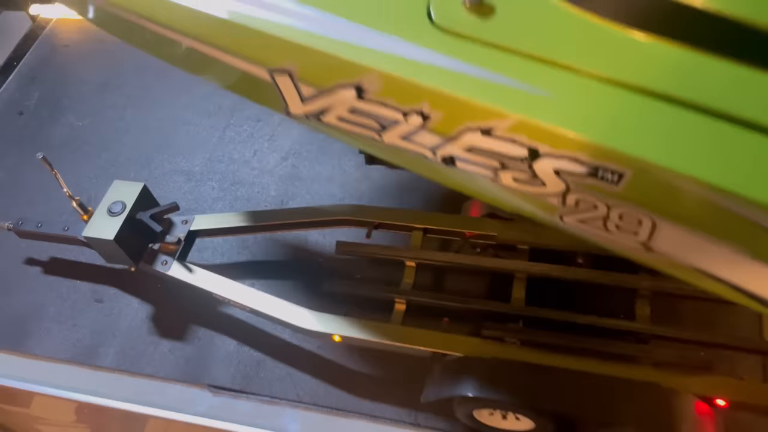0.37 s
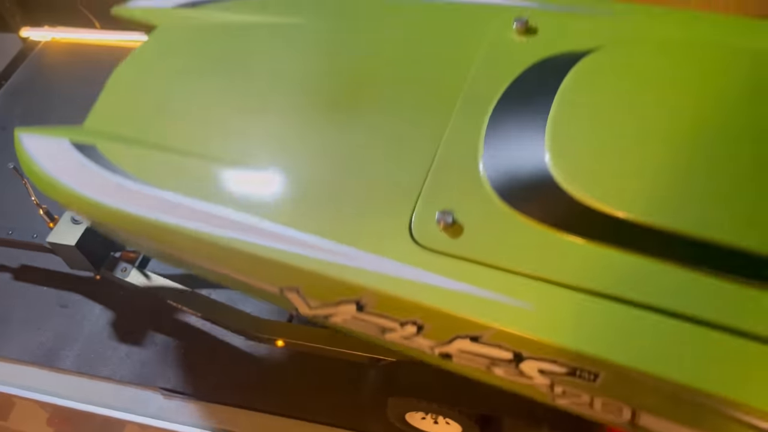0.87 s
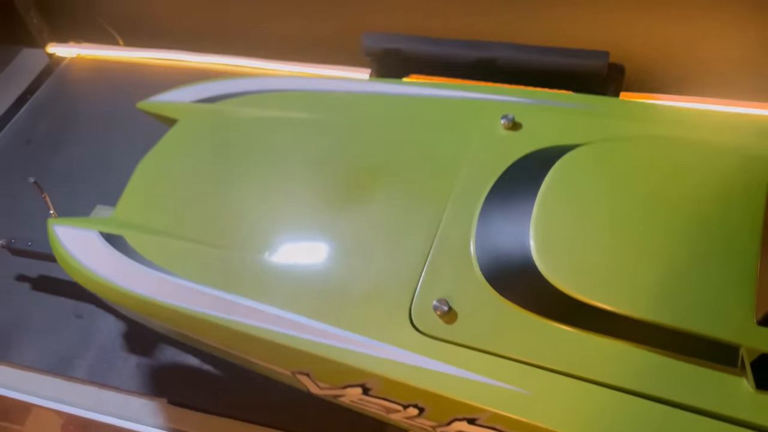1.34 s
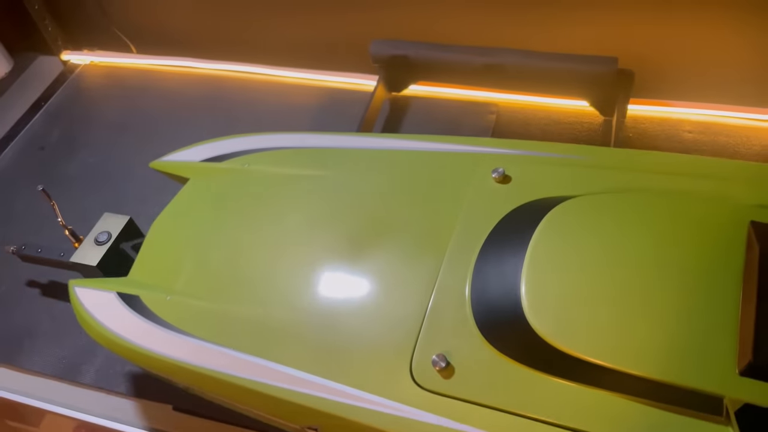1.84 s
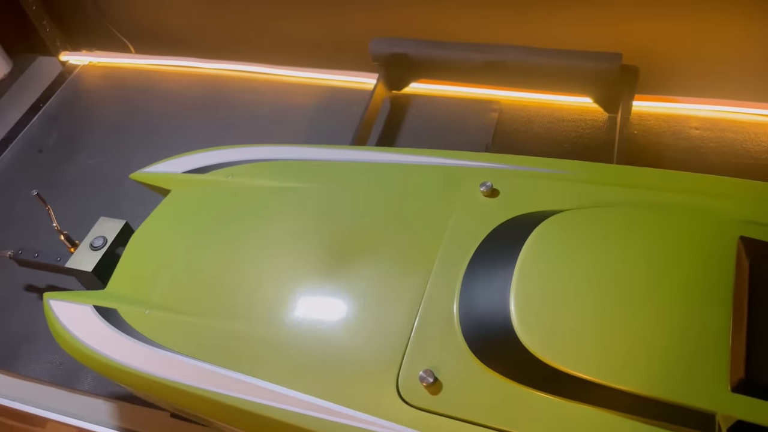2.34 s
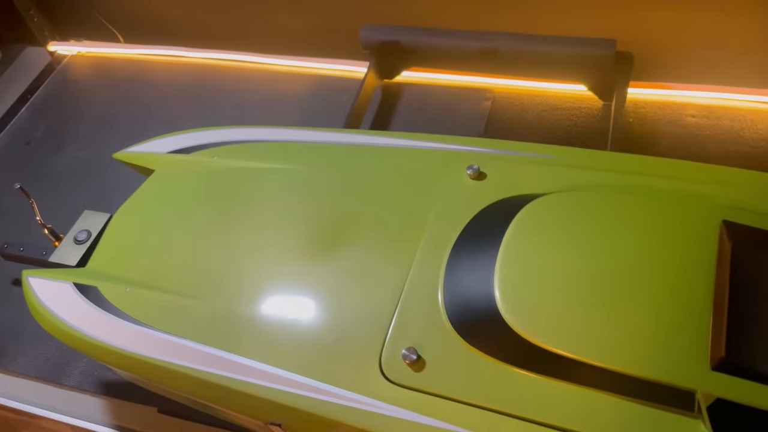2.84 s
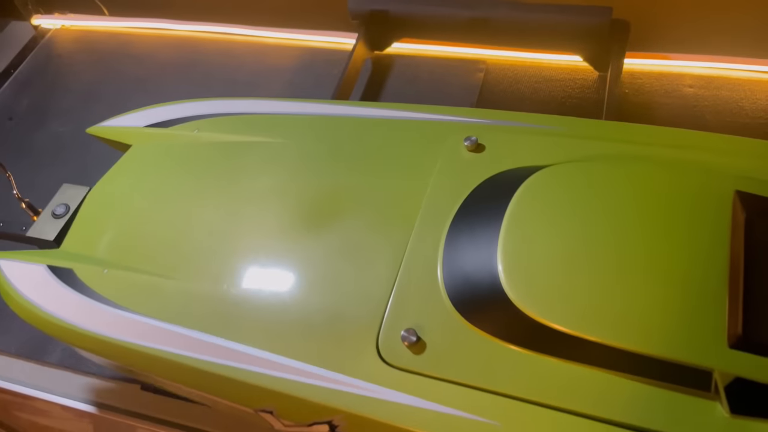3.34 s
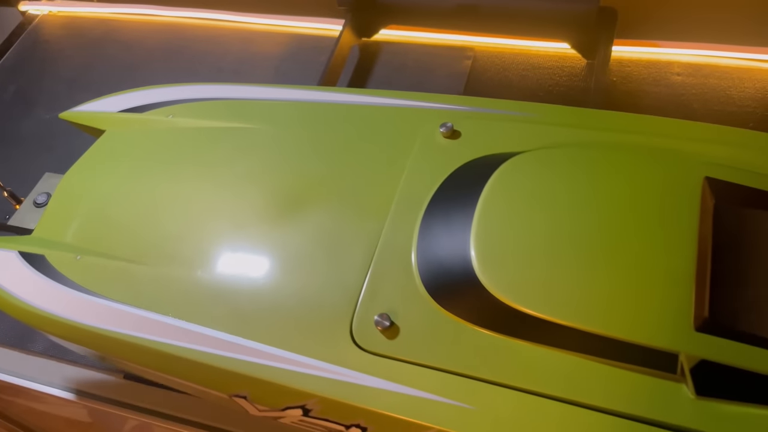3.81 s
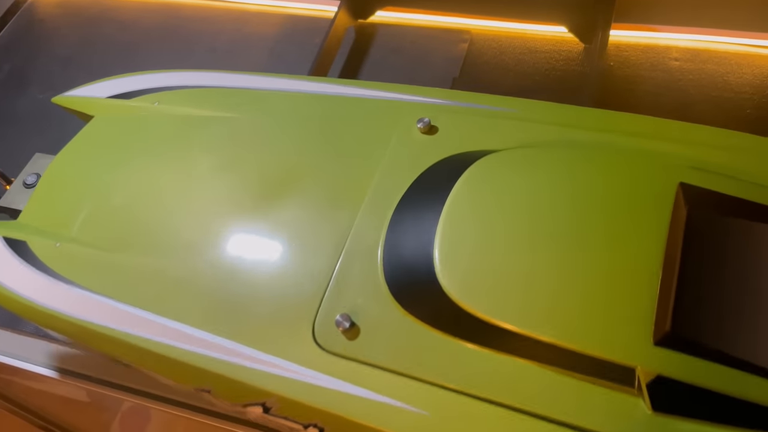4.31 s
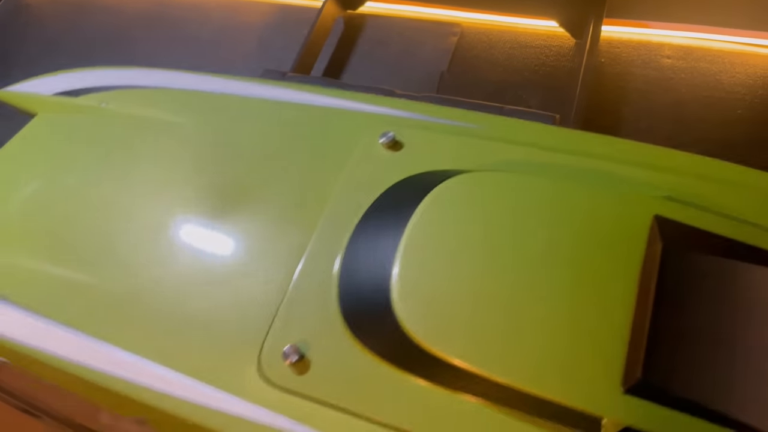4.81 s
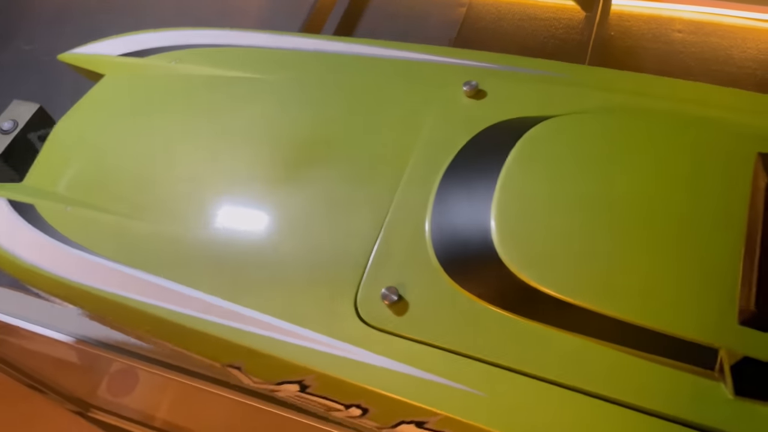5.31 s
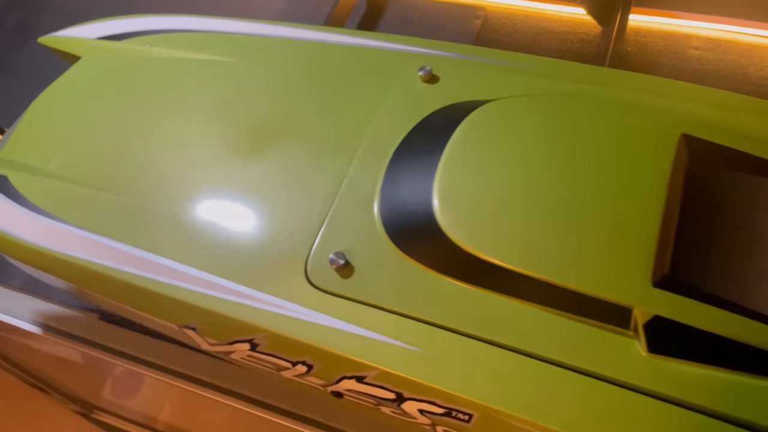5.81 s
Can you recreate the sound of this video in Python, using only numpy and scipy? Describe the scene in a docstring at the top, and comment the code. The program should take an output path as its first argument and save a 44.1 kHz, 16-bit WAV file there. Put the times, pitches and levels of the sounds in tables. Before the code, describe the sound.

In a quiet room with low rumble, faint rubs and ticks precede a loud hollow plastic clunk on a metal trailer near two seconds, followed by quick fading taps. Short shoves then drag the hull along the rails with knocks, brief squeaks and gritty rasp. Two heavy knocks follow after five seconds, then a last rub. Close stereo microphone.

```python
"""A quiet room, low rumble and still air, heard from close by with a two-port microphone.
Faint rubs and ticks come first, then a hollow plastic hull lands on a small metal trailer with a clunk.
Short shoves drag it along the rails with knocks, squeaks and some rasp; two more heavy knocks and a last rub follow.
Damped modes make the shell and rails ring, damped sines make the loaded frame bob on its tyres,
shaped noise makes the rubbing, and decaying noise makes the walls answer."""
import sys
import numpy as np
from scipy import signal
from scipy.fft import rfft, irfft, next_fast_len
from scipy.io import wavfile
from scipy.ndimage import uniform_filter1d, map_coordinates

SR = 44100
rng = np.random.default_rng(int(sys.argv[2]) if len(sys.argv) > 2 else 0)


def digitize_waveform(pressure):
    """Quantize a signal to 16-bit integers and store it at the path in sys.argv[1].

    Rows of a 2-D input are taken as channels; values are limited to [-1, 1].
    """
    field = np.atleast_2d(pressure).T
    bounded = np.clip(field, -1, 1)
    quanta = np.round(bounded * 32767).astype(np.int16)
    wavfile.write(sys.argv[1], SR, quanta)


def level_to_linear(level):
    """Convert decibel levels to linear amplitude factors, elementwise."""
    exponent = np.asarray(level, float) / 20
    return 10 ** exponent


N = 260714  # length in samples

# modes of the plastic shell, for blows and rubbing alike: mode_hz [Hz], level_db [dB], t60_s [s]
SHELL_MODES = [(236, -6, 0.13), (262, -13, 0.1), (311, -6, 0.16), (360, -8, 0.15), (411, -2, 0.09),
               (454, 0, 0.14), (498, -9, .1), (540, -5, 0.12), (588, -9, 0.08), (682, -9, 0.12),
               (848, -13, 0.035)]
# modes of the metal rails, for hard edges and rubbing: mode_hz [Hz], level_db [dB], t60_s [s]
RAIL_MODES = [(1013, -4, 0.07), (1215, -2, 0.05), (1340, -1, 0.06), (1454, -4, 0.05), (1600, -3, 0.045),
              (1716, -3, .05), (1830, -2, 0.04), (1959, 2, 0.08), (2100, -3, 0.05), (2275, 0, .06),
              (2430, -5, 0.05), (2640, -8, .04), (2870, -12, 0.04), (3120, -15, 0.04)]
# after a heavy landing the hull rocks to rest in ever slower, weaker taps:
# start_s [s], first_gap_s [s], first_level_db [dB], edge_hz [Hz], crack_db [dB re tap], taps [count]
ROCKING_TAPS = [(1.937, .0195, -19, 1900, -16, 6), (5.192, .036, -29, 1500, -32, 2)]


def unit(x):
    """Scaled to rms 1."""
    return x / np.sqrt(np.mean(x ** 2) + 1e-20)


def along(points, hz):
    """Reads (Hz, value) points on a log frequency axis."""
    f, v = np.transpose(points)
    return np.interp(np.log(hz + 1), np.log(f + 1), v)


def gains(rows):
    """One gain per sample for each dB column; all but silent outside the rows, with soft ends."""
    s, *columns = np.transpose(rows)
    t = np.arange(N) / SR
    level = np.array([level_to_linear(np.interp(t, s, column, -150, -150)) for column in columns])
    return np.abs(uniform_filter1d(level, size=400, axis=1))


def wobble(rate):
    """A smooth random curve, rate knots a second."""
    knots = rng.standard_normal(int(N * rate / SR) + 4)
    return map_coordinates(knots, [np.arange(N) * rate / SR])


def filtered(x, response):
    """x shaped by a response given as a function of frequency."""
    m = next_fast_len(N + SR // 2)
    return irfft(rfft(x, m) * response(np.fft.rfftfreq(m, 1 / SR)), m)[..., :N]


def spread(two, colour):
    """Mixes two unrelated signals to left and right: alike in the bass, mostly less so in the treble."""
    # likeness of the two ports, negative where they oppose: band_hz [Hz], likeness [-1 to 1]
    alike = [(100, .96), (300, .93), (520, .6), (900, .35), (2600, .2), (6000, .1), (8500, -.7),
             (10500, -.6), (13000, .6)]

    def turn(hz):
        return np.arccos(np.clip(along(alike, hz), -1, 1)) / 2

    mid, side = filtered(two, lambda hz: colour(hz) * [np.cos(turn(hz)), np.sin(turn(hz))])
    return np.array([mid + side, mid - side])


def pair(colour, grain=1):
    """Coloured stereo noise of rms 1; grain roughens the drive ahead of the colour."""
    return unit(spread(grain * rng.standard_normal((2, N)), colour))


def shoves():
    """Gains of shell, rails and grit: a brighter rub drives the rails more and the grit more still."""
    # one curve a shove: start_s [s], pressure_db [dB], brightness_db [dB, rails over shell]
    curves = [
        [(0.0, -76, -2.5), (0.058, -75, 1.5), (0.1, -81, -2), (0.2, -101, -9)],
        [(0.36, -86, -3), (0.418, -76, -1.5), (0.444, -69, 3.5), (0.532, -102.5, 1.5), (0.578, -99, -5.5),
         (0.612, -71, -2), (0.72, -105, -13)],
        [(2.38, -77, -19), (2.494, -59, -17), (2.544, -60.5, -17), (2.575, -69.5, -11), (2.64, -54, -19.5),
         (2.716, -57, -14), (2.828, -67, -19.5), (2.89, -83.5, -38)],
        [(3.045, -61, -14), (3.07, -54.5, -14), (3.15, -55, -14.5), (3.255, -52.5, -10), (3.295, -50.5, -22.5),
         (3.315, -46, -17.5), (3.4, -50.5, -8), (3.435, -53.5, -12), (3.49, -49.5, -5), (3.576, -72, -32),
         (3.63, -69.5, -17)],
        [(3.635, -70, -19), (3.674, -60, -16), (3.732, -64, -12.5), (3.792, -61.5, -10.5), (3.866, -59.5, -13),
         (3.918, -57.5, -5), (3.996, -58, -11), (4.06, -80, -24.5), (4.102, -101, -10)],
        [(4.15, -86, -16), (4.172, -62, -9.5), (4.242, -59, -14), (4.298, -52, -4.5), (4.385, -57.5, -6.5),
         (4.41, -58, -23), (4.43, -51.5, -3.5), (4.478, -53, -2), (4.495, -77, -20), (4.575, -87.5, -8)],
        [(4.596, -62, -11.5), (4.625, -69.5, -24.5), (4.65, -56.5, -24), (4.68, -52.5, -36), (4.711, -86, -12),
         (4.78, -82, -25)],
        [(5.165, -68, 4), (5.2, -62, 4), (5.235, -63, 4), (5.255, -88, 0)],
        [(5.5, -70, 4.5), (5.548, -62.5, -2.5), (5.726, -54, -5), (5.762, -56, -3.5), (5.818, -58, 2),
         (5.86, -62.5, 4.5), (5.91, -46, -6)],
    ]
    grit_db, grit_grows = -9.5, 2.13  # grit over shell at brightness 0; dB of grit per dB of brightness
    total = 0
    for rows in curves:
        total = total + gains([(s, db, db + bright_db, db + grit_db + grit_grows * bright_db)
                               for s, db, bright_db in rows])
    return total


def background():
    """A lumpy low rumble, stirred by jolts of the floor and by shoves, over the still air of the room."""
    # room rumble: start_s [s], level_db [dB]
    rumble_level = [(0.0, -59.5), (0.4, -64), (0.67, -64.5), (0.92, -62), (1.4, -66), (2.4, -61),
                    (4.0, -60.5), (5.0, -62.5), (5.91, -61)]
    # colour of the rumble: band_hz [Hz], density_db [dB per Hz]
    lows = [(13, -50), (22, -24), (49, -5.5), (91, -11), (104, -12.5), (124, -8), (140, -8), (168, -22.5),
            (250, -23.5), (320, -55), (550, -120)]
    # colour of the still air: band_hz [Hz], density_db [dB per Hz]
    air_colour = [(150, -25.5), (220, -8), (380, -6.5), (600, -18.5), (1000, -24), (2000, -28.5),
                  (4000, -34.5), (6500, -36), (8500, -30), (13000, -25)]
    # jolts that shake the floor: start_s [s], level_db [dB], t60_s [s]
    floor_jolts = [(1.961, -40, 1), (2.599, -45.5, 0.44), (3.3, -63.5, 0.74), (3.47, -44.5, 1),
                   (4.6, -38.5, 0.45), (5.123, -31, 0.35), (5.418, -45, 0.54)]
    rise_s, shove_shakes_db, air_db = 0.077, -12, -74.5
    t = np.arange(N) / SR
    level = gains(rumble_level) + level_to_linear(shove_shakes_db) * shoves()[0]
    for s, db, t60 in floor_jolts:
        since = np.clip(t - s, 0, None)
        level = level + level_to_linear(db - 60 * since / t60) * (1 - np.exp(-since / rise_s))
    lumps = level_to_linear(2.4 * wobble(9))
    rumble = level * unit(lumps * pair(lambda hz: level_to_linear(along(lows, hz))))
    return rumble + level_to_linear(air_db) * pair(lambda hz: level_to_linear(along(air_colour, hz)))


def resonances(modes, hz, widen):
    """Gain of the modes under steady drive; widen scales the width of each resonance."""
    power = sum(level_to_linear(2 * db) / (1 + ((hz - c) * t60 / widen) ** 2) for c, db, t60 in modes)
    return np.sqrt(power)


def dragging():
    """The hull judders along the rails: uneven slips drive shell and rails and shed grit."""
    # broad colour of rubbing: band_hz [Hz], density_db [dB per Hz]
    rub = [(120, -5.5), (200, -6.5), (300, -5.5), (420, 0.5), (600, -5.5), (800, -9.5), (1600, -9.5),
           (2400, -20), (3200, -25.5), (4500, -58.5)]
    # colour of the grit: band_hz [Hz], density_db [dB per Hz]
    grit_colour = [(2200, -20.5), (3000, -7.5), (3600, -7), (4400, -10.5), (5000, -11.5), (5600, -12.5),
                   (6500, -8.5), (8000, -11.5), (11000, -20.5), (15000, -19.5)]
    shell, rails, grit = shoves()
    judder = [unit(level_to_linear(1.7 * wobble(50))) for _ in range(3)]
    slips = level_to_linear(2.5 * wobble(400))

    def upper(hz):  # share of the rub that goes to the rails
        return 1 / (1 + (900 / (hz + 1)) ** 6)

    def shell_colour(hz):  # contact damps the shell and so widens its modes
        return level_to_linear(along(rub, hz)) * (1 - upper(hz)) * (8.9 + resonances(SHELL_MODES, hz, widen=1.7))

    def rail_colour(hz):
        return level_to_linear(along(rub, hz)) * upper(hz) * (10.0 + resonances(RAIL_MODES, hz, widen=0.59))

    low = pair(shell_colour, slips)
    mid = pair(rail_colour, slips)
    high = pair(lambda hz: level_to_linear(along(grit_colour, hz)), slips)
    return shell * low * judder[0] + rails * mid * judder[1] + grit * high * judder[2]


def walls(x):
    """Each frequency of the room's answer dies at its own speed; a new noise tail every quarter second."""
    # decay of the room: band_hz [Hz], t60_s [s]
    room_decay = [(100, 0.47), (400, 0.3), (2000, 0.38), (8000, 0.37)]
    out, step = np.zeros((2, N + 2 * SR)), SR // 4
    for start in range(0, N, step):
        hz, t, z = signal.stft(rng.standard_normal((2, SR * 3 // 5)), SR, nperseg=512)
        fade = level_to_linear(-60 * t / along(room_decay, hz)[:, None])
        tail = signal.istft(z * fade, SR, nperseg=512)[1]
        tail = tail / np.linalg.norm(tail[0])
        wet = signal.fftconvolve(x[:1, start:start + step], tail, axes=1)  # the left side feeds the room
        out[:, start + 200:][:, :wet.shape[1]] += wet  # 200 samples of delay
    return spread(out[:, :N], np.ones_like)


def ring(modes, t, scatter_db, skew, tilt_db):
    """Damped modes, stirred anew by each contact: skew radians out of step, tilt dB an octave."""
    hz, db, t60 = np.transpose(modes)[:, :, None]
    db = db + tilt_db * np.log2(hz) + scatter_db * rng.standard_normal(hz.shape)
    phase = skew * rng.standard_normal(hz.shape)
    wave = np.sum(level_to_linear(db - 60 * t / t60) * np.sin(2 * np.pi * hz * t + phase), 0)
    return wave / np.linalg.norm(level_to_linear(db))


def taps():
    """Rows like the blows for the hull rocking to rest."""
    gap_grows, loss_db, tap_edge_db = 1.1, 4, -13.5  # gap ratio and loss from tap to tap
    return [(s + gap * (gap_grows ** k - 1) / (gap_grows - 1), db - loss_db * k, tap_edge_db, hz)
            for s, gap, db, hz, crack_db, count in ROCKING_TAPS for k in range(count)]


def noise_band(t, lo_hz, hi_hz):
    """Two unrelated noises between two frequencies."""
    sos = signal.butter(2, [lo_hz, hi_hz], "bandpass", fs=SR, output="sos")
    return signal.sosfilt(sos, rng.standard_normal((2, len(t))))


def blows():
    """Each blow clicks on the rails, then rings the shell; hard contacts and taps crack briefly."""
    # blows of hull on rail: start_s [s], level_db [dB], edge_db [dB, hard edge re blow], edge_hz [Hz]
    knocks = [(.104, -75, 8.5, 1800), (.205, -72, -4, 1000), (0.293, -62, -10, 1100),
              (1.022, -48.5, -19.5, 1500), (1.045, -51.5, -40, 1300), (1.919, -25.5, 5, 2000),
              (1.922, -12, -15, 1950), (1.927, -24, -14, 1500), (2.157, -42.5, -10, 1700),
              (2.611, -38, -22.5, 1400), (3.062, -57.5, -5, 1500), (3.09, -48, -28.5, 1200),
              (3.26, -43, -5, 1900), (3.307, -47, -10, 1600), (3.441, -31.5, -22, 1300),
              (3.474, -23, -17, 1450), (3.479, -28, -21, 1400), (4.169, -48, -16, 1500),
              (4.193, -51, -12, 1600), (4.269, -46.5, -10, 1600), (4.419, -43, -5, 1600),
              (4.597, -56, -3, 1700), (4.631, -41, -12.5, 2200), (4.668, -45, -8, 1500),
              (5.827, -39, -14, 1600), (5.119, -17, -21, 1200), (5.1275, -26, -24, 1200),
              (5.155, -18, -12, 1500), (5.163, -20, -16, 1700), (5.277, -41, -20, 1200),
              (5.389, -22, -13, 1400), (5.39, -13.5, -27, 1300), (5.396, -16.5, -27, 1500)]
    # bright cracks of the hardest contacts: start_s [s], level_db [dB]
    hard_cracks = [(0.104, -61.5), (1.921, -27.5), (3.262, -53), (3.443, -55.5), (3.474, -47.5),
                   (4.194, -61), (4.634, -67), (5.156, -40.5), (5.386, -34)]
    shell_lags_s, edge_octaves, edge_rise_s, shell_side = 0.00087, 0.96, 0.0006, 0.45
    body, sharp = np.zeros((2, N + SR)), np.zeros((2, N + SR))
    t = np.arange(SR // 2) / SR
    t_shell, t_edge = t[:SR // 4], t[:SR // 8]
    # the first cycles stand out, then the resting contact damps the shell
    grip = (1 - np.exp(-t_shell / 0.001)) * (1 + 2.01 * np.exp(-t_shell / 0.01))
    rocking = taps()
    for s, db, edge_db, edge_hz in knocks + rocking:
        soft_db = 0.14 * (edge_db + 21)  # a soft contact favours the low modes
        shell = np.array([ring(SHELL_MODES, t_shell, scatter_db=2.5, skew=0.95, tilt_db=soft_db)
                          for _ in range(2)])
        near = [(hz, level - 6 * (np.log2(hz / edge_hz) / edge_octaves) ** 2, t60)
                for hz, level, t60 in RAIL_MODES]
        # short waves reach the two ports by different paths; loose parts add a rattle of noise
        rails = np.array([ring(near, t_edge, scatter_db=9, skew=3.6, tilt_db=-11) for _ in range(2)])
        rattle = noise_band(t, edge_hz / 1.88, edge_hz * 1.374) * level_to_linear(-60 * t / 0.05)
        edge = 0.96 * rails + 2.04 * rattle[:, :SR // 8]
        edge = level_to_linear(edge_db) * (1 - np.exp(-t_edge / edge_rise_s)) * edge
        body[:, round((s + shell_lags_s) * SR):][:, :SR // 4] += level_to_linear(db) * 0.32 * shell * grip
        sharp[:, round(s * SR):][:, :SR // 8] += level_to_linear(db) * edge
    tap_crack_db = [crack_db for *_, crack_db, count in ROCKING_TAPS for _ in range(count)]
    tap_cracks = [(row[0], row[1] + re_db) for row, re_db in zip(rocking, tap_crack_db)]
    for s, db in hard_cracks + tap_cracks:
        fade = 0.41 * level_to_linear(-60 * t / 0.022) + 0.15 * level_to_linear(-60 * t / 0.09)  # a snap and a longer tail
        crack = noise_band(t, 2900, 8900) * fade
        crack = crack + 0.06 * noise_band(t, 9000, 15000) * level_to_linear(-60 * t / 0.015)
        sharp[:, round(s * SR):][:, :len(t)] += level_to_linear(db) * crack
    return spread((body * [[1], [shell_side]] + sharp)[:, :N], np.ones_like)


def swings(rows, rise_s):
    """Damped sines with a soft start, each half a second long."""
    out, t = np.zeros(N + SR), np.arange(SR // 2) / SR
    for s, db, hz, t60 in rows:
        wave = np.sin(2 * np.pi * hz * t) * (1 - np.exp(-t / rise_s))
        out[round(s * SR):][:len(t)] += level_to_linear(db - 60 * t / t60) * wave
    return out[:N]


def bobbing():
    """The loaded frame bobs on its tyres in low damped swings; freed rails ring on unsteadily."""
    # the frame bobs at a pitch set by its load: start_s [s], level_db [dB], pitch_hz [Hz], t60_s [s]
    bobs = [(0.105, -60.5, 150, 0.21), (0.294, -46, 100.3, 0.15), (1.045, -56, 111.6, 0.27),
            (1.921, -23, 115.5, .1), (1.923, -37, 151.2, 0.22), (1.99, -33.5, 61, 0.45),
            (2.001, -40.5, 180, 0.22), (2.139, -45, 60.1, 0.28), (2.611, -36, 161, .6),
            (2.615, -39, 80, .2), (3.441, -34, 130, .4), (3.4795, -29.5, 130, .42), (3.09, -44, 89, 0.22),
            (3.26, -37, 133, 0.22), (4.17, -56, 106.7, 0.22), (4.193, -46.5, 159, 0.24),
            (4.269, -57, 131, 0.26), (4.42, -42.5, 124.2, 0.38), (4.632, -52, 157, 0.26),
            (4.668, -45.5, 141, 0.27), (5.12, -27, 180, .1), (5.121, -33, 86, .2), (5.146, -24, 109, .15),
            (5.157, -26, 180, .25), (5.163, -28, 138, .25), (5.191, -27, 111, .2), (5.23, -35, 140, .25),
            (5.389, -24.5, 111, .3), (5.391, -23.5, 180.5, .25), (5.397, -31, 89, 0.24),
            (5.414, -24.5, 142.8, 0.31)]
    # a free rail rings on after a slip: start_s [s], level_db [dB], pitch_hz [Hz], t60_s [s]
    rail_rings = [(4.45, -66, 2440, .9), (4.47, -62, 3120, .3), (4.46, -60, 1450, .25),
                  (4.52, -67, 1250, .3), (1.922, -36, 1950, .1)]
    unsteady = level_to_linear(2.5 * np.array([wobble(40), wobble(40)]))  # left and right apart
    return swings(bobs, rise_s=0.0018) + swings(rail_rings, rise_s=0.0048) * unsteady


def squeaks():
    """Sticking contacts squeal in unsteady, broken narrow tones that swell and fade."""
    # squeals: start_s [s], length_s [s], pitch_hz [Hz], level_db [dB]
    squeals = [(0.432, 0.072, 1348, -67), (0.77, 0.22, 2010, -84), (0.599, 0.059, 1400, -81),
               (3.066, 0.23, 390.8, -54), (3.298, 0.071, 1633, -54.5), (3.322, 0.035, 1261, -49.5),
               (3.348, 0.1, 1631, -64), (3.482, 0.034, 2470, -60), (3.651, 0.09, 1342, -65),
               (3.769, 0.046, 1320, -61), (3.66, 0.06, 2570, -73), (3.78, .22, 1493, -65.5),
               (4.269, 0.086, 412.7, -48), (4.273, 0.073, 678.6, -50), (4.291, 0.039, 1760, -57.5),
               (4.333, 0.032, 431, -44.5), (4.37, 0.036, 1633, -49), (4.374, 0.045, 1283, -59),
               (4.42, 0.081, 3130, -59), (4.454, 0.037, 3105, -53.5), (4.427, 0.074, 1424, -50),
               (4.47, 0.036, 1055, -76), (4.504, .06, 1300, -82), (5.176, 0.06, 1980, -49.5),
               (5.16, 0.041, 1338, -36), (5.72, .05, 545, -50.5), (5.71, 0.19, 6450, -71.5)]
    drift_rad, flutter_db, swell_skew = 0.11, 3.5, 0.8  # random phase step a sample; skew below 1 swells fast
    out = np.zeros((2, N))
    for s, length, hz, db in squeals:
        u = np.arange(round(length * SR)) / SR
        drift = np.cumsum(rng.standard_normal((2, len(u))), 1) * drift_rad
        swell = np.sin(np.pi * (u / length) ** swell_skew)
        out[:, round(s * SR):][:, :len(u)] += level_to_linear(db) * swell * np.sin(2 * np.pi * hz * u + drift)
    return spread(out * unit(level_to_linear(flutter_db * wobble(55))), np.ones_like)


def rasp():
    """Fine gritty noise in one treble band during some shoves."""
    # rasp: start_s [s], level_db [dB]
    rasp_level = [(3.04, -92), (3.07, -89), (3.12, -103), (3.17, -87), (3.25, -86), (3.3, -88), (3.35, -76),
                  (3.42, -82.5), (3.45, -78), (3.5, -75.5), (3.56, -92.5), (3.62, -100), (3.86, -100),
                  (3.93, -84), (4.0, -94), (4.05, -100)]
    centre_hz, width_hz = 5600, 800
    grain = level_to_linear(3 * wobble(500))
    band = pair(lambda hz: np.exp(-0.5 * ((hz - centre_hz) / width_hz) ** 2), grain)
    return gains(rasp_level) * band


def scene():
    """Hull, trailer and room; each source feeds the walls by its own share."""
    hits, bob = blows(), bobbing()
    drag, squeal = dragging() + rasp(), squeaks()
    wet = level_to_linear(-6.5) * hits + level_to_linear(-3.0) * drag + level_to_linear(-19) * squeal + level_to_linear(-16) * bob
    return hits + bob + drag + squeal + walls(wet) + background()


def low_pass(x):
    """Removes everything above the highest recorded frequency."""
    return signal.sosfilt(signal.butter(12, 15500, fs=SR, output="sos"), x)


def record(dry):
    """The microphone drops deep bass and top treble; its left port hears more treble."""
    # left port over right: band_hz [Hz], lean_db [dB]
    port_lean = [(100, -1), (500, -.5), (1100, 3), (2600, 5), (5000, 6), (8000, 1), (13000, .5)]
    # response of the microphone: band_hz [Hz], gain_db [dB]
    mic_response = [(20, -22), (35, -9), (55, 0), (6500, 4), (8000, -2.5), (10500, -3), (13000, -15),
                    (16000, -17)]

    def ports(hz):
        return level_to_linear(np.outer([0.5, -0.5], along(port_lean, hz)) + along(mic_response, hz))

    mix = filtered(dry, ports)
    return low_pass(mix)


dry = scene()
out = record(dry)
digitize_waveform(out)
```